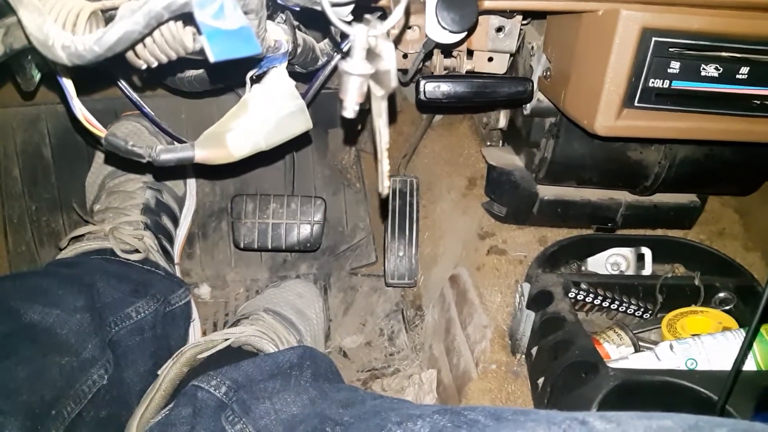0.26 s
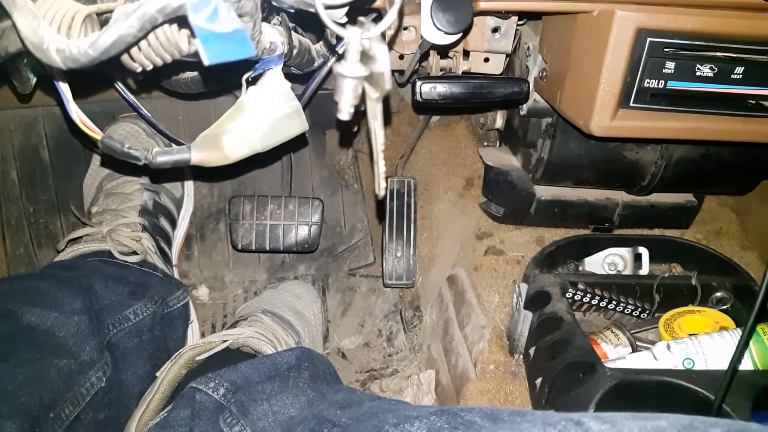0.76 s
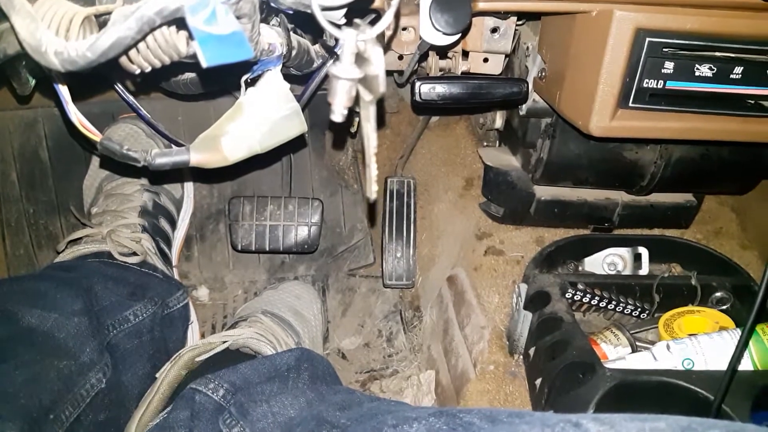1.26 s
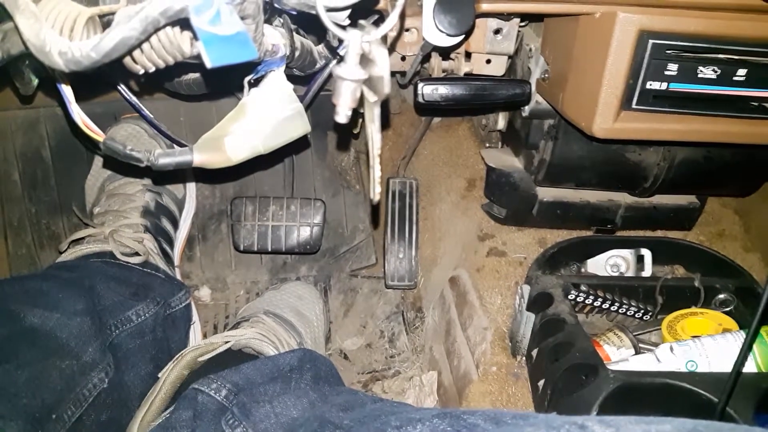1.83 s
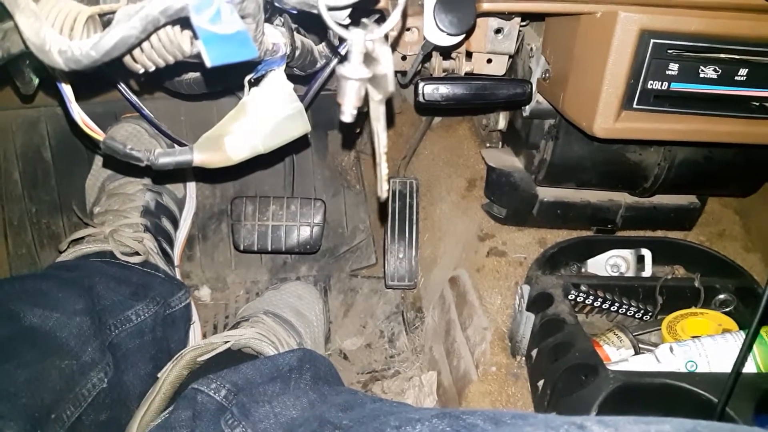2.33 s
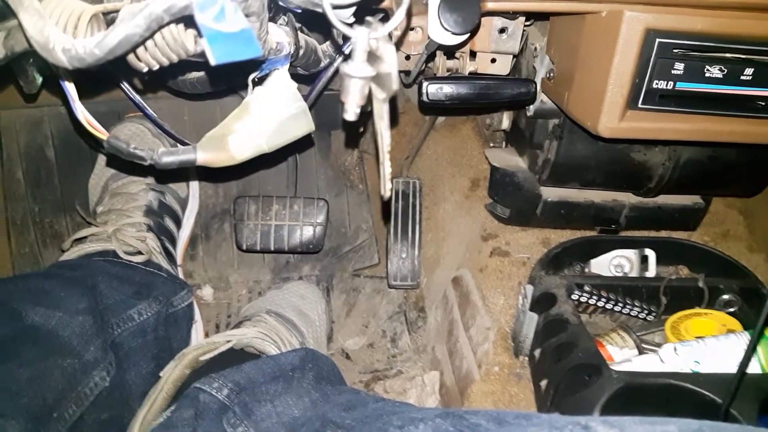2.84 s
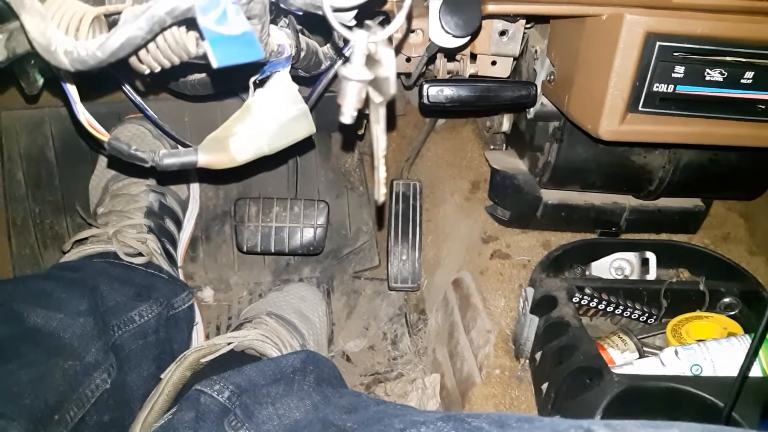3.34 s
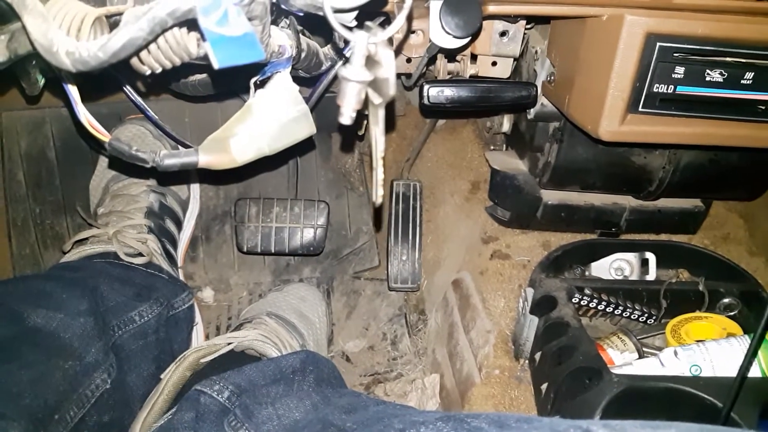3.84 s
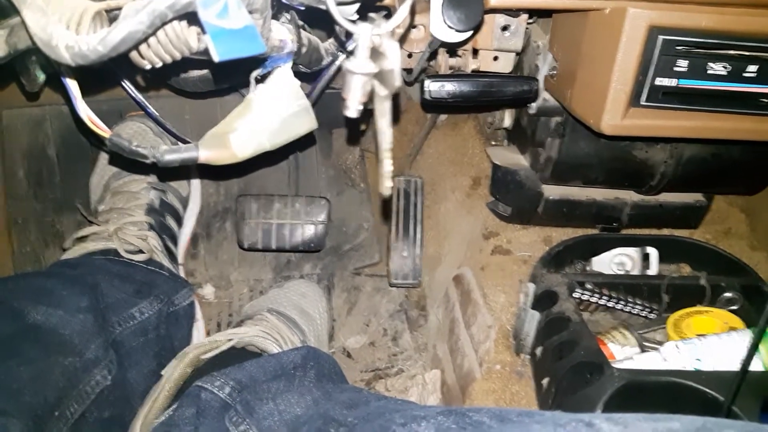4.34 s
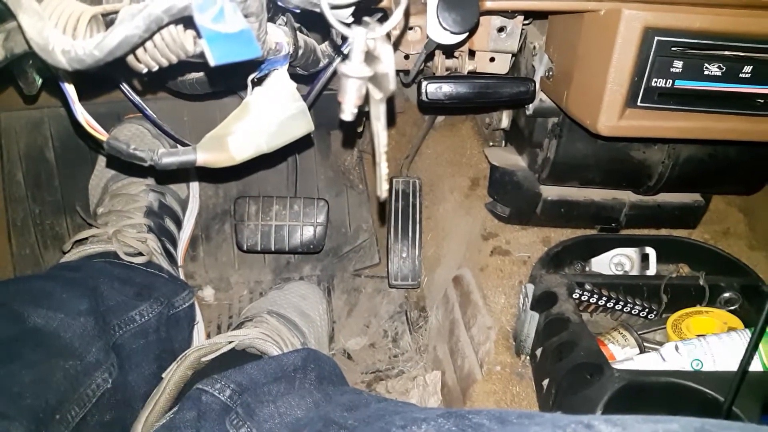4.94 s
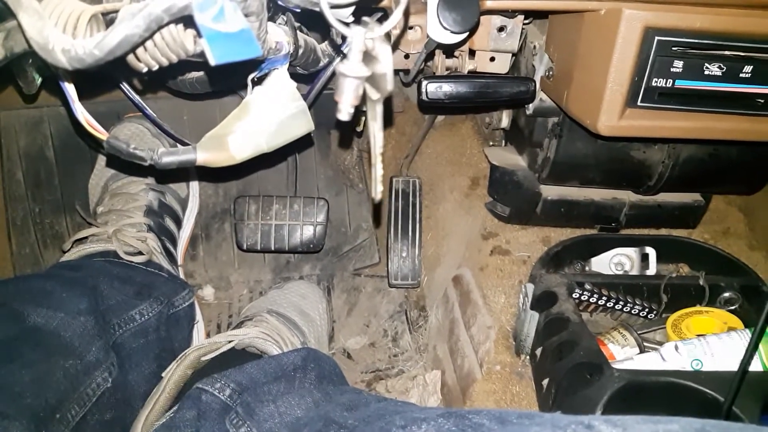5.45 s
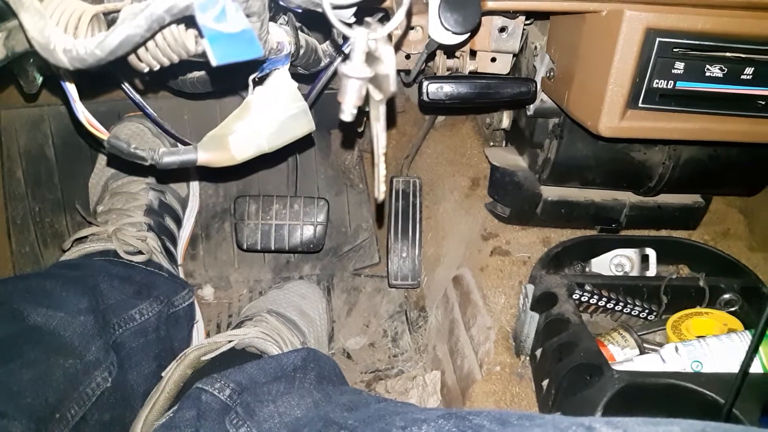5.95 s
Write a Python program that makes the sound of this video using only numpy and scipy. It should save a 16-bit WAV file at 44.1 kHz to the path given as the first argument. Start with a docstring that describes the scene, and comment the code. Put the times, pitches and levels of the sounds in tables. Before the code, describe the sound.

An old four-cylinder engine idles roughly from cold, booming low in the cab with belt hum, muffled valve clatter and faint intake hiss.

```python
"""Cold engine idling, from the driver's seat

Just after a cold start, an old four-cylinder's firing orders (sinusoids locked to the crank) boom
in the cab, with resonant thumps. Fan and belt-driven pump hum as harmonic series; filtered noise
makes the valve gear's clatter and taps behind the firewall, and the intake hiss, in engine time."""
import sys
import numpy as np
from scipy import signal
from scipy.fft import rfft, irfft, next_fast_len
from scipy.io import wavfile
from scipy.ndimage import map_coordinates

SR = 44100
rng = np.random.default_rng(int(sys.argv[2]) if len(sys.argv) > 2 else 0)


def bounce(signal):
    """Save signal as a 16-bit WAV file at the path given by the first command-line argument."""
    frames = np.transpose(np.atleast_2d(signal))
    limited = np.clip(frames, -1, 1)
    pcm = np.round(limited * 32767).astype(np.int16)
    wavfile.write(sys.argv[1], SR, pcm)


N = 272979

# cab resonances, relative levels: center_hz, width_hz, level_db
CAB_MODES = [(72, 25, -11), (97, 16, 0), (160, 28, -2), (270, 70, -17)]
IDLE_RPM = 1035  # reference crankshaft speed


def amp(db):
    """Level law: decibels become an amplitude ratio."""
    return 10 ** (np.asarray(db) / 20)


def unit(x):
    """Energy normalization: scale to an rms of 1."""
    return x / np.sqrt(np.mean(x ** 2) + 1e-20)


def along(points, hz):
    """Logarithmic frequency scale: interpolate (Hz, value) points along it."""
    point_hz, values = np.transpose(points)
    return np.interp(np.log(hz + 1), np.log(point_hz + 1), values)


def curve(rows):
    """Linear interpolation: (s, value) rows become one value per sample."""
    return np.interp(np.arange(N) / SR, *np.transpose(rows))


def wobble(rate):
    """Slow random modulation: a smooth curve through random knots, rate knots a second."""
    knots = rng.standard_normal(int(N * rate / SR) + 4)
    return map_coordinates(knots, [np.arange(N) * rate / SR])


def filtered(x, response):
    """Linear filtering: multiply the spectrum by a response of frequency, with mirrored ends."""
    edge = SR // 4
    wide = np.pad(x, [(0, 0)] * (x.ndim - 1) + [(edge, edge)], "reflect")
    size = next_fast_len(wide.shape[-1])
    spectrum = rfft(wide, size) * response(np.fft.rfftfreq(size, 1 / SR))
    return irfft(spectrum, size)[..., edge:edge + N]


def resonances(modes, f):
    """Modal superposition: damped (Hz, width Hz, dB) resonators summed with alternating sign."""
    total = 0
    for k, (center, width, db) in enumerate(modes):
        damping = 1j * f * width
        total = total + (-1) ** k * amp(db) * damping / (center ** 2 - f ** 2 + damping)
    return total


def air():
    """Interaural coherence: stereo white noise, alike in the bass and nearly unrelated in the treble."""
    # left-right correlation: frequency_hz, correlation
    likeness = [(60, .99), (150, 0.31), (290, 0.57), (640, 0.22), (1400, 0.042)]

    def mid_and_side(hz):
        turn = np.arccos(np.clip(along(likeness, hz), -1, 1)) / 2
        return np.array([np.cos(turn), np.sin(turn)])

    mid, side = filtered(rng.standard_normal((2, N)), mid_and_side)
    return np.array([mid + side, mid - side])


def strokes(turns, scatter_db):
    """Periodic excitation: an impulse of scattered size as turns passes each whole number."""
    at = np.flatnonzero(np.diff(np.floor(turns)) > 0)
    return np.bincount(at, amp(scatter_db * rng.uniform(-0.91, 1, len(at))), N)


def bursts(impulses, t60, attack):
    """Exponential decay: each impulse swells and dies away (both times in s)."""
    t = np.arange(SR // 4) / SR
    envelope = amp(-60 * t / t60) * (1 - np.exp(-t / attack))
    return signal.fftconvolve(impulses, envelope)[:N]


def cycle_rate(rpm):
    """Four-stroke kinematics: one cycle for every two turns of the crankshaft, in Hz."""
    return rpm / 60 / 2


def intake(cycle, db, steady):
    """Turbulent flow noise: air hisses past the nearly closed throttle, surging with each intake stroke."""
    # gulps, one per cylinder: cycle_place (0-1), strength
    gulps = [(.99, .15), (0.16, .5), (0.47, 0.81), (0.7, 1.9)]
    # relative spectrum of the hiss: frequency_hz, level_db
    hiss = [(2000, -21), (5000, -7), (8500, -5.5), (11000, -9), (12500, 2.5), (14000, 6), (15800, 3.5)]
    surges = sum(strength * strokes(cycle - place, scatter_db=4.0) for place, strength in gulps)
    flow = steady + bursts(surges, t60=0.12, attack=.003)
    return amp(db) * unit(filtered(air() * flow, lambda hz: amp(along(hiss, hz))))


def tappets(cycle, db, width):
    """Impact excitation: loose parts tap at fixed places in the cycle, each with its own short ring."""
    # valve gear taps, levels before the gain db: cycle_place (0-1), level_db, ring_hz, t60_s
    taps = [(.10, -47, 1360, 0.045), (.24, -64, 7500, 0.068), (.43, -44, 3130, 0.027),
            (.58, -45.5, 3160, 0.043), (.625, -55.5, 3210, 0.068), (.86, -41.5, 1370, 0.048),
            (.93, -44, 1860, 0.032)]
    out = np.zeros((2, N))
    for place, level, hz, t60 in taps:
        # squaring the resonance narrows its band
        tone = filtered(rng.standard_normal((2, N)), lambda f: resonances([(hz, hz * width, 0)], f) ** 2)
        hits = bursts(strokes(cycle - place, scatter_db=2.0), t60, attack=0.0011)
        out += amp(level + db) * unit(tone) * hits
    return out


def clatter(cycle, wash_db, ring_db, beat):
    """Amplitude-modulated noise: eight valve events a cycle roughen the churn and ring the block."""
    # relative spectrum through the firewall: frequency_hz, level_db
    firewall = [(120, -2.5), (200, 1), (290, 0), (400, -1.5), (520, -7), (700, -13), (1000, -15.5),
                (1250, -10.5), (1650, -16), (2000, -14.5), (2600, -21), (3300, -19.5), (5400, -32),
                (6600, -32.5), (8300, -42)]
    # block and covers, relative, before the power of 1.5 below: center_hz, width_hz, level_db
    block = [(861.4, 24, -2), (1158, 33, -1), (1244, 14, -0.5), (1405, 17, 0), (1713, 60, -5),
             (1840, 37, -1), (1922, 43, -2.5), (3244, 103, -4.5), (3540, 50, -15), (4180, 150, -11.5),
             (5020, 60, -13), (6180, 170, -14)]
    drive = 3.5 + beat * bursts(strokes(8 * cycle, scatter_db=7.5), t60=0.067, attack=0.0006)

    def churn(hz):
        return amp(along(firewall, hz)) * hz ** 2 / (hz ** 2 + 100 ** 2)

    def ringing(hz):
        # magnitudes add, so neighboring modes do not cancel
        return np.sqrt(sum(np.abs(resonances([mode], hz)) ** 3 for mode in block))

    wash = unit(filtered(air() * drive, churn))
    ring = unit(filtered(air() * drive, ringing))
    return amp(wash_db) * wash + amp(ring_db) * ring


def footwell(x):
    """Comb filtering: short reflections between metal and plastic color each side's treble differently."""
    db, t60 = -11, .08  # echo gain in dB, decay in s
    t = np.arange(SR // 20) / SR
    tail = rng.standard_normal((2, len(t))) * amp(-60 * t / t60)
    tail /= np.linalg.norm(tail, axis=1, keepdims=True)
    echoes = signal.fftconvolve(x, tail, axes=1)[:, :N]
    return x + amp(db) * filtered(echoes, lambda hz: hz ** 4 / (hz ** 4 + 2200 ** 4))


def engine_bay(cycle):
    """Cyclic modulation: clatter is louder on one side of the cycle; taps and hiss join it in the footwell."""
    lope = amp(0.37 * np.cos(2 * np.pi * (cycle - .75)) + 0.32 * wobble(20))
    metal = lope * clatter(cycle, wash_db=-40.5, ring_db=-50.5, beat=.55)
    metal = metal + tappets(cycle, db=-1.5, width=0.1)
    hiss = amp(0.51 * wobble(8.7)) * intake(cycle, db=-60.0, steady=1.05)
    return footwell(metal + hiss)


def fan(cycle, sway_db):
    """Blade-passing tones: the seven-bladed fan drones on its belt at multiples of its shaft speed."""
    # partials, rms levels before the sway: shaft_multiple, level_db
    partials = [(2, -68), (4, -55), (5, -53), (7, -40)]
    shaft = 2.66 * cycle  # turns
    out = np.zeros(N)
    for multiple, db in partials:
        level = amp(db + sway_db * wobble(5.5))
        out += level * np.sin(2 * np.pi * (multiple * shaft + rng.random()))
    return np.sqrt(2) * out


def pump(cycle, rpm, first_db, second_db, third_db, flutter_db, rough_db):
    """Sympathetic resonance: belt slip flutters the hum; a loose panel buzzes near its second partial."""
    fade_db_per_rpm = 0.35  # the third partial weakens with speed
    # above this speed, with a soft threshold, the panel sings along with the second partial
    panel_from_rpm, panel_soft_rpm, panel_lift_db = 1041.5, 2.2, 4.9
    pulses = 19.71 * cycle + .03 * wobble(4) + .02 * wobble(25)
    singing = 1 / (1 + np.exp((panel_from_rpm - rpm) / panel_soft_rpm))
    second = second_db + panel_lift_db * singing
    third = third_db + fade_db_per_rpm * (IDLE_RPM - rpm)
    hum = np.zeros(N)
    for partial, db in enumerate([first_db, second, third], start=1):
        hum += amp(db + flutter_db * wobble(22)) * np.sin(2 * np.pi * partial * pulses)
    buzz = unit(filtered(air(), lambda hz: resonances([(344.5, 31, 0)], hz) ** 2))
    return np.sqrt(2) * hum + amp(rough_db) * buzz


def stumble(cycle, db):
    """Impulse response: cold combustion is uneven, and each firing's excess or lack thumps the cab."""
    firings = strokes(4 * cycle, scatter_db=1)
    uneven = firings * rng.uniform(-1.09, 1, N)
    thumps = filtered(uneven, lambda hz: resonances(CAB_MODES, hz) / (1 + (hz / 330) ** 4))
    return amp(db) * unit(thumps)


def boom(cycle, rpm, sway_db):
    """Order synthesis: firings shake the cab; unequal cylinders rock the engine, adding orders between."""
    # levels against the twelfth order: cycle_multiple, level_db
    orders = [(4, -7.5), (6, -26), (7, -25), (8, -8), (9, -19), (10, -15), (11, -12), (12, 0), (13, -21),
              (15, -18), (16, -11), (20, -7), (21, -17), (28, -23), (44, -28)]
    firing_lag, rocking_lag = .593, .583  # places in the cycle (0-1) where push and rocking begin
    # the twelfth order's rms level at idle, and the loss per rpm above idle for an order at 115 Hz
    throb_db, fade_db_per_rpm = -30.18, 0.2031
    swell_db = fade_db_per_rpm * (IDLE_RPM - rpm)
    out = np.zeros(N)
    for order, relative_db in orders:
        hz = order * cycle_rate(IDLE_RPM)
        lag = rocking_lag if order % 4 else firing_lag
        near = np.abs(resonances([(115, 36, 0)], hz)) ** 2  # orders near 115 Hz vary most with speed
        level = throb_db + near * swell_db + relative_db + sway_db * wobble(5)
        cab_phase = np.angle(resonances(CAB_MODES, hz))
        # each firing first draws the cab's air in, delayed by its resonances
        out -= amp(level) * np.cos(2 * np.pi * order * (cycle - lag) + cab_phase)
    return np.sqrt(2) * out


def scene():
    """Superposition: boom and belts reach both sides alike, then a filter dulls the left side."""
    # the idle hunts and slowly climbs as the engine warms: time_s, crankshaft_rpm
    speed = [(0.0, 1024.2), (0.68, 1033.2), (0.79, 1023.4), (1.52, 1034.4), (2.02, 1022.5), (2.52, 1036.0),
             (3.11, 1032.5), (3.24, 1046.8), (3.5, 1027.5), (3.9, 1050.0), (4.3, 1018.4), (4.83, 1042.6),
             (5.38, 1050.0), (5.6, 1042.4), (6.19, 1058.0)]
    # the left side is duller in the middle and cut off above about 11.5 kHz,
    # left minus right: frequency_hz, level_db
    left_tilt = [(60, -1.4), (160, -2.5), (300, -6.5), (450, -4), (650, -5.5), (900, -14), (1400, -16),
                 (2300, -19), (3800, -21.5), (5500, -9.5), (7500, -1), (10500, 1), (11300, 1.5),
                 (12200, -16.5)]
    rpm = curve(speed)
    cycle = np.cumsum(cycle_rate(rpm)) / SR
    bay = engine_bay(cycle)
    belts = fan(cycle, sway_db=3.0)
    belts = belts + pump(cycle, rpm, first_db=-48, second_db=-44, third_db=-57.8,
                         flutter_db=1.0, rough_db=-50.5)
    low = stumble(cycle, db=-39) + boom(cycle, rpm, sway_db=1.2)
    left, right = low + belts + bay
    return np.array([filtered(left, lambda hz: amp(along(left_tilt, hz))), right])


def record(dry):
    """Band limiting: nothing passes from 15800 Hz up."""
    return filtered(dry, lambda hz: hz < 15800)


dry = scene()
out = record(dry)
bounce(out)
```